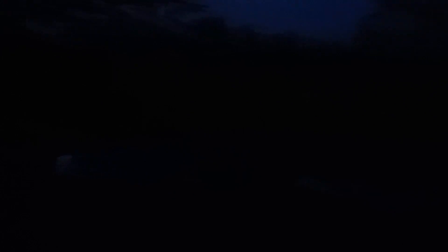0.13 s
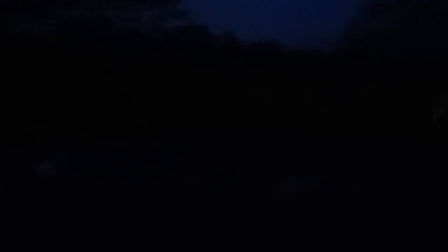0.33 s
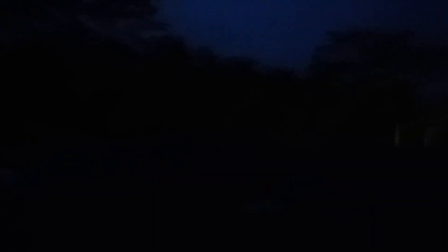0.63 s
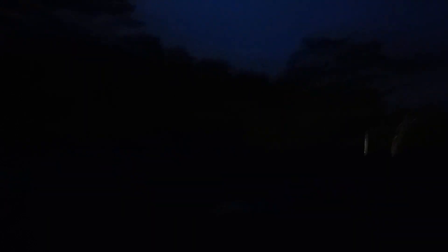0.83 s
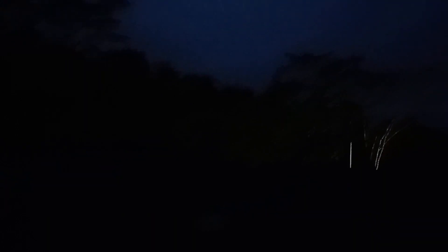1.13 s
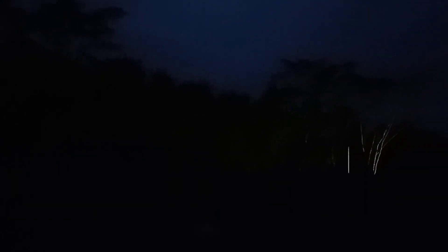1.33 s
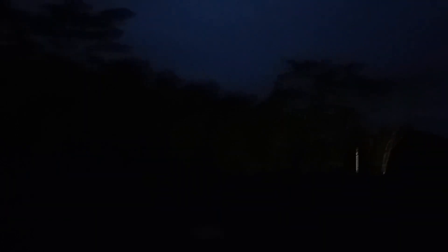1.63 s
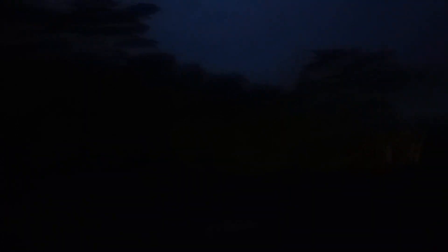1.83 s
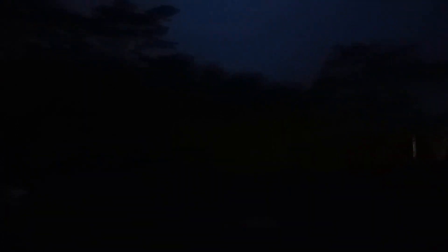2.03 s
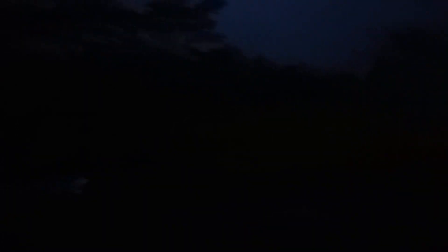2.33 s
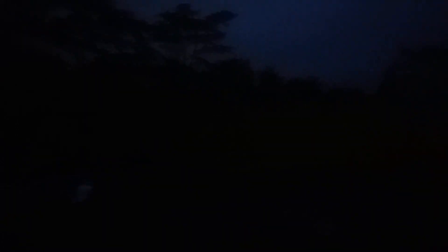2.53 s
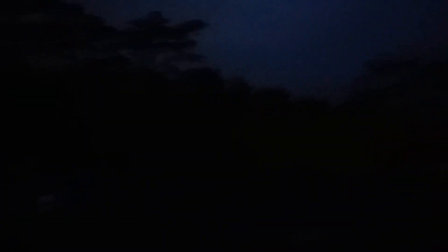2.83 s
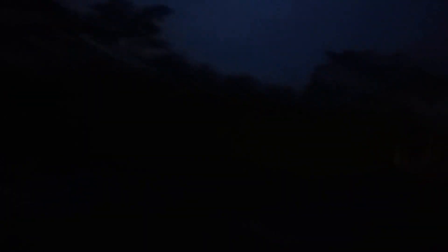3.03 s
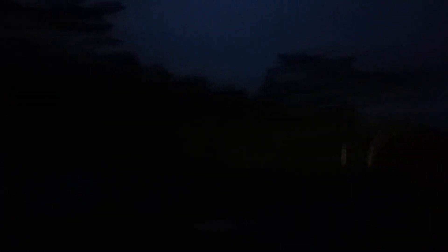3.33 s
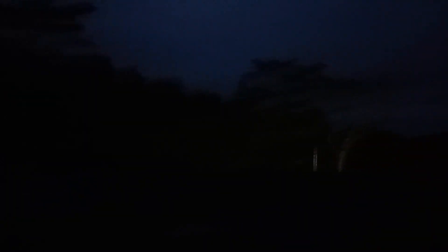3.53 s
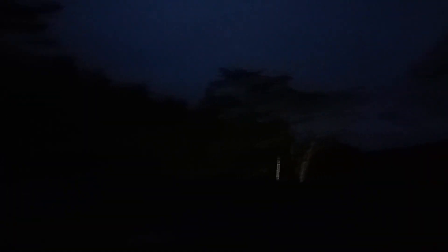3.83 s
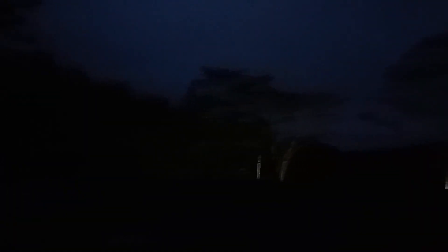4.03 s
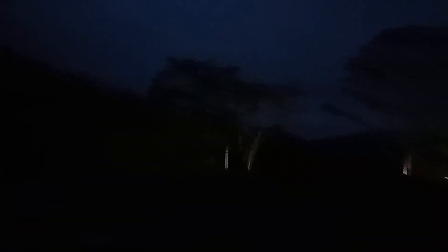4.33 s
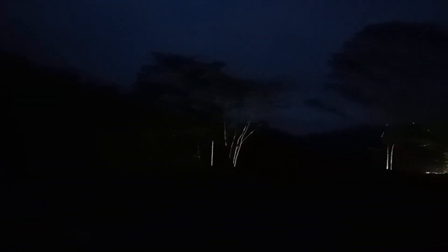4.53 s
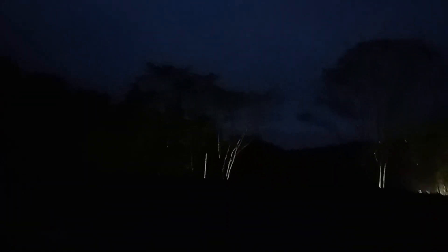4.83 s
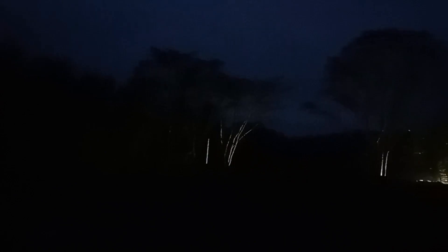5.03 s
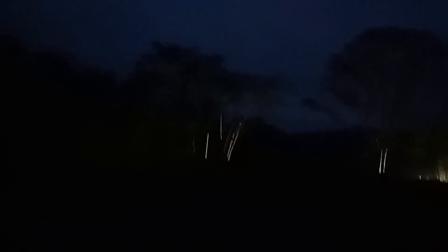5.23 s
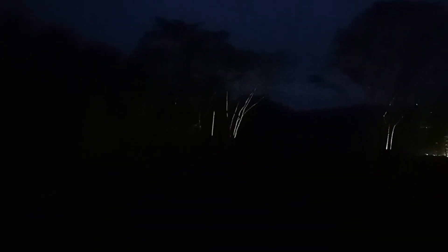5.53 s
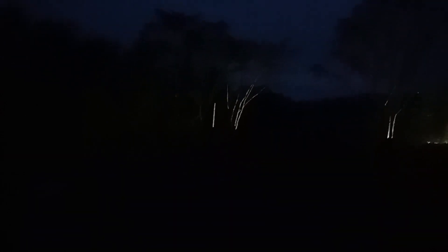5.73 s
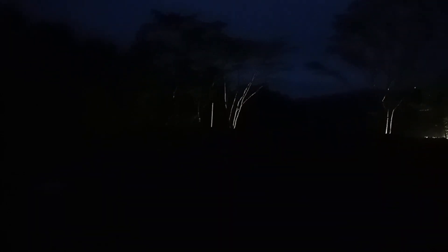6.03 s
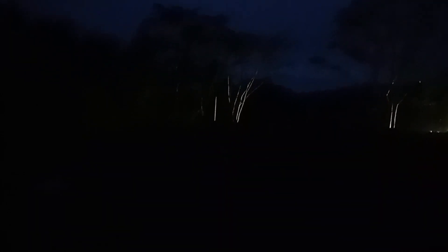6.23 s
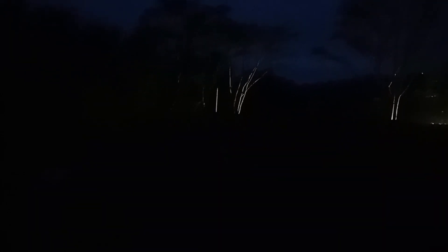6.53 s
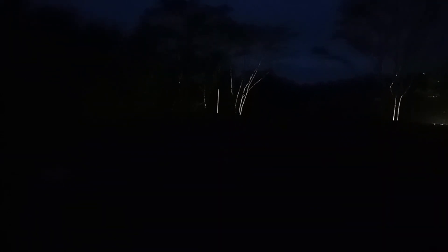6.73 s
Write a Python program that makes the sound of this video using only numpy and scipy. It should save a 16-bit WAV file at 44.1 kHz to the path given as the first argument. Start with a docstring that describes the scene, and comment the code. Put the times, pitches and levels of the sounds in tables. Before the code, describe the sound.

Dusk insect chorus with thin bird whistles echoing off trees, soft frog calls, distant machine hum, and close clicks and scrapes of handling.

```python
"""A forest edge at nightfall, heard at the two microphone ports of a hand-held camera.
Crickets chirp in stroke pairs of falling sine; bush crickets buzz as pulsed noise in narrow resonances.
Birds whistle in gliding sines with tree echoes, and a frog calls 'kee-oo': a falling glide, then a held note.
Fingers rustle, tick and scrape on the camera body: grainy filtered noise and short decaying modes.
Behind them lie a hiss of distant insects and far machines: steady sines over shaped noise."""
import sys
import numpy as np
from scipy import signal
from scipy.fft import rfft, irfft, next_fast_len
from scipy.io import wavfile
from scipy.ndimage import map_coordinates

SR = 44100
rng = np.random.default_rng(int(sys.argv[2]) if len(sys.argv) > 2 else 0)


def dump(signal):
    """Clip the signal to [-1, 1] and save it as 16-bit WAV at the path in sys.argv[1]."""
    limited = np.clip(np.atleast_2d(signal).T, -1, 1)
    pcm = np.round(limited * 32767).astype(np.int16)
    wavfile.write(sys.argv[1], SR, pcm)


N = 303849
SIDE = np.array([[.5], [-.5]])  # shares a left-right difference between the ports


def crickets():
    """Wings chirp at nearly even pace: a steady cricket, a neighbour with its own timing, a lower one in bouts."""
    # runs of chirps: (first chirp [s], last chirp [s], first level [dB], last level [dB])
    steady_runs = [(.07, .671, -63, -69), (.786, 1.146, -65.5, -65.5), (1.27, 2.139, -64.5, -69),
                   (2.348, 3.031, -68, -71.5), (3.133, 4.0, -65.5, -65.5), (4.135, 5.372, -66, -66),
                   (5.506, 6.855, -66, -66)]
    neighbour_runs = [(1.624, 2.23, -71, -75), (2.292, 3.003, -72, -68), (3.73, 3.974, -68, -71),
                      (4.116, 4.949, -66, -71.5), (5.098, 5.471, -80, -69), (5.711, 5.818, -70.5, -71),
                      (5.969, 6.31, -69, -71), (6.452, 6.822, -70.5, -67)]
    low_runs = [(.117, .548, -68, -67), (1.742, 2.177, -72, -67), (3.195, 3.632, -72.5, -70.5)]
    pace_s, low_pace_s = .121, .0725  # usual time from chirp to chirp
    steady = chirps(runs(steady_runs, pace_s), 5920, fall_hz=850, length_s=.021, gap_s=.022,
                    overtones_db=[], click_db=-25, pan_db=5, lead=1.2)
    neighbour = chirps(runs(neighbour_runs, pace_s), 5850, fall_hz=1050, length_s=.0172, gap_s=-.0084,
                       overtones_db=[], click_db=-39, pan_db=6.5, lead=-1.95)
    low = chirps(runs(low_runs, low_pace_s), 3820, fall_hz=700, length_s=.014, gap_s=.021,
                 overtones_db=[-9, -10], click_db=0, pan_db=4.5, lead=.8)
    near = steady + neighbour + low
    return near + amp(-4) * trees(near, t60=.2)


def runs(rows, pace_s):
    """Rows of (time, level) for every chirp in evenly paced runs, each a little early or late."""
    paced = []
    for first_s, last_s, first_db, last_db in rows:
        count = round((last_s - first_s) / pace_s) + 1
        paced.append(np.linspace([first_s, first_db], [last_s, last_db], count))
    chirp_rows = np.concatenate(paced)
    return chirp_rows + [.0017, 1] * rng.standard_normal(chirp_rows.shape)  # stray in s and dB


def chirps(rows, hz, fall_hz, length_s, gap_s, overtones_db, click_db, pan_db, lead):
    """Two wing strokes a chirp; the pitch falls through each, and a noise click sits in its first half."""
    # the camera turns: (time [s], extra phase by which left leads [rad])
    swing = [(0, 0.79), (.6, 0.94), (1.1, .1), (2.1, .1), (2.6, 0.8), (3.3, 0.2), (5, 0.092), (6.89, 0.09)]
    out = np.zeros((2, N))
    t = np.arange(-1, 1, 2 / (length_s * SR))  # -1 to 1 across one stroke
    stroke = np.cos(np.pi / 2 * t) ** 2
    for (s, db), luck in zip(rows, rng.standard_normal((len(rows), 4))):
        turned_lead = lead + np.interp(s, *np.transpose(swing))
        for k in (0, 1):
            pitch = hz * (1 + 0.0132 * luck[k]) - fall_hz * t / 2
            size = amp(db + 1.4 * luck[k + 2])
            sound = sum(tone(order * pitch, stroke * amp(over_db), pan_db, turned_lead)
                        for order, over_db in enumerate([0] + overtones_db, 1))
            click = np.diff(rng.standard_normal((2, len(t) + 1))) * np.exp(-((t + 0.26) / 0.74) ** 2)
            panned_click = amp(click_db + pan_db * SIDE) * click
            add(out, s + k * gap_s - length_s / 2, size * (sound + panned_click))
    return out


def bush_crickets():
    """One buzzes on two wing resonances in phrases that swell and stop dead; another never pauses."""
    # near phrases: (start [s], end [s], upper resonance level [dB], lower resonance level [dB])
    phrases = [(-.2, .48, -77, -82), (1.104, 1.725, -79, -79), (2.301, 2.96, -77, -76),
               (3.4, 4.225, -77.5, -70.5), (4.696, 5.48, -81, -76), (5.997, 6.749, -84, -76.5)]
    # the unbroken buzz: (time [s], level [dB])
    far_level = [(0, -77), (.27, -79), (.88, -71.5), (1.1, -79), (2.55, -74), (3.6, -80), (4.4, -81),
                 (6.1, -77), (6.89, -83)]
    t, upper, lower = np.arange(N) / SR, 0, 0
    for start, end, upper_db, lower_db in phrases:
        rise = np.clip((t - start) / (end - start), 0, 1) ** 0.58
        swell = rise * np.clip((end - t) / 0.017, 0, 1)
        upper = upper + amp(upper_db) * swell
        lower = lower + amp(lower_db) * swell
    near = upper * rasp(145, 7410, 200) + lower * rasp(145, 6814, 270)
    far = amp(curves(far_level)[0]) * rasp(152, 6900, 450)
    return near * amp([[1.5], [-1.5]]) + far


def rasp(rate, hz, width_hz):
    """Wing strokes pulse noise through one resonance, their rate wandering slightly."""
    phase = 2 * np.pi * np.cumsum(rate + 1.4 * wobble(4.4)) / SR
    gate = (1 + np.sin(phase)) ** 0.31
    noise = gate * rng.standard_normal((2, N))
    return unit(filtered(noise, lambda f: ring([(hz, width_hz, 0)])(f) ** 2))


def birds():
    """Whistles are gliding sines that flutter as leaves scatter them, with long echoes from the trees."""
    # long whistles of one bird: (start [s], length [s], pitch [Hz], climb [Hz/s], droop at the end [Hz],
    # level [dB], time of the level dip within the note [s], phase by which left leads [rad])
    held = [(2.774, 0.21, 3112, 352, 1, -62, 0.032, -1), (3.476, 0.27, 2890, 346, 0, -61.5, 0.21, -2),
            (4.248, .215, 2815, 353, 198.5, -57, .11, -2.5), (4.929, 0.21, 2788, 447, 232, -57, 0.11, -2.5),
            (5.137, 0.16, 2980, 1060, 2, -65, .03, -2.5), (5.567, 0.287, 2776, 746, -3, -58.5, 0.14, -2.5),
            (6.088, 0.2, 2707, 850, -5, -56.5, 0.13, -2), (6.409, 0.2, 2678, 603, 5, -58, 0.13, -2),
            (6.609, 0.099, 2674, 504, -3, -57, 0.095, -2)]
    # short bent notes: (start [s], length [s], first pitch [Hz], middle pitch [Hz], last pitch [Hz],
    # level [dB], left-right difference [dB], phase by which left leads [rad], echo relative to note [dB])
    pips = [(0.052, 0.095, 2655, 2740, 2770, -65, -4, 1.57, -1.5),
            (0.153, 0.065, 2760, 2780, 2660, -71.5, 2, 0.2, 0),
            (0.278, 0.065, 2590, 2653, 2650, -67, -4, 0.9, 0),
            (0.402, 0.089, 2470, 2546, 2610, -73, 2, 1.57, 0),
            (.52, 0.052, 2430, 2490, 2520, -73.5, -2.5, 0.5, -7),
            (0.628, 0.033, 2440, 2420, 2460, -65.5, 1, 1.57, -7),
            (.735, .045, 2290, 2320, 2400, -74, 0, 1.5, -7),
            (.845, 0.048, 2220, 2310, 2600, -75, -2.5, 1, -2),
            (.732, 0.024, 3530, 3440, 3230, -69, 3, -2, 0.5),
            (1.002, 0.032, 2280, 2580, 2950, -62, 3, 2.5, -6),
            (1.045, 0.05, 2760, 2570, 2270, -67, 1, 1.5, -10),
            (1.83, 0.017, 2730, 2600, 2490, -72, 2, -8, -11),
            (2.147, 0.04, 3090, 3560, 3500, -62, 2.4, -2, -4),
            (2.303, .03, 4200, 3720, 3300, -73, 3.5, 4.5, -5),
            (2.332, 0.046, 3140, 3010, 3240, -58.5, 2, 4, -7),
            (2.456, 0.0434, 2370, 2690, 2550, -65, 2.4, 1.1, -7),
            (2.498, 0.091, 2350, 2500, 2970, -61.5, 3, 0.6, -7),
            (2.59, .05, 3000, 2690, 2000, -65, 2.4, .9, -10),
            (3.868, 0.023, 3210, 3540, 3170, -65, 2.2, -1.4, -29.5),
            (4.127, 0.031, 2340, 2680, 3040, -73, 4, 4, -4),
            (4.008, .025, 2530, 2480, 2500, -75, 4, 1.5, -9),
            (4.172, .058, 2990, 2650, 2340, -66.5, 1, 4, -3.5),
            (5.233, 0.055, 3150, 3476, 3160, -72, 6, 0, -1),
            (6.595, 0.023, 3680, 3450, 3080, -68, 2.7, -1.5, -3),
            (6.694, 0.032, 2570, 2584, 2660, -65, -1.5, -3, -2),
            (6.772, 0.048, 2480, 2667, 2680, -60.5, -1.5, -2, -3),
            (6.823, .055, 2620, 2630, 2500, -67.5, -3, -1.5, -4)]
    rise_s, fall_s, held_pan_db, held_echo_db = 0.014, 0.036, -0.6, -7.5
    dip_db, dip_s = 7.5, 0.019  # a long note dips once in level where its echoes interfere
    scoop_hz, scoop_s, droop_s = 328, .011, .018  # long notes slide up into their pitch
    pip_sharp = .5  # power of the half-sine envelope
    flutter_db = 3
    notes = []
    for s, length, hz, climb, droop_hz, db, dip_at, lead in held:
        t = np.arange(0, length, 1 / SR)
        edges = np.clip(np.minimum(t / rise_s, (length - t) / fall_s), 0, 1)
        level = edges * amp(db - dip_db * np.exp(-((t - dip_at) / dip_s) ** 2))
        scoop = scoop_hz * np.exp(-t / scoop_s)
        droop = droop_hz * np.exp((t - length) / droop_s)
        pitch = hz + climb * t - scoop - droop
        notes.append((s, pitch, level, held_pan_db, lead, held_echo_db))
    for s, length, first_hz, middle_hz, last_hz, db, *perch in pips:
        u = np.arange(0, 1, 1 / (length * SR))  # fraction of the note
        bend = np.polyfit([0, .5, 1], [first_hz, middle_hz, last_hz], deg=2)
        notes.append((s, np.polyval(bend, u), amp(db) * np.sin(np.pi * u) ** pip_sharp, *perch))
    direct, far, flutter = np.zeros((2, N)), np.zeros((2, N)), wobble(45)
    for s, pitch, level, pan_db, lead, echo_db in notes:
        at = np.minimum(round(s * SR) + np.arange(len(pitch)), N - 1)
        note = tone(pitch, level * amp(flutter_db * flutter[at]), pan_db, lead)
        add(direct, s, note)
        add(far, s, amp(echo_db) * note)
    return direct + trees(far, t60=1.2)


def trees(x, t60):
    """Trunks scatter echoes: decaying noise after a 12 ms gap, a new tail for each port."""
    t = np.arange(SR * 3 // 4) / SR
    tail = rng.standard_normal((2, len(t))) * amp(-60 * t / t60) * (t > .012)
    return signal.fftconvolve(x, tail / np.linalg.norm(tail[0]), axes=1)[:, :N]


def frog():
    """A falling glide, then a held note that reaches the ports in nearly opposite phase."""
    # calls: (start [s], glide level [dB], held note level [dB])
    calls = [(0.154, -86, -67), (0.56, -71, -70), (0.682, -77, -73), (1.172, -73.5, -74), (1.403, -72, -71),
             (1.568, -74, -76), (1.893, -72, -70), (1.992, -74, -79), (2.269, -69, -67.0),
             (2.389, -76, -77.0), (2.645, -69.5, -66), (3.001, -68.5, -68), (3.391, -69.5, -66),
             (4.078, -73, -67), (4.646, -76, -73), (4.85, -71, -72.0), (5.011, -70.5, -67),
             (5.239, -70, -73), (5.369, -72.5, -68), (5.628, -75, -73), (6.042, -69.5, -71.0),
             (6.252, -73, -71.0), (6.627, -72.5, -66)]
    # glide of every call: (time into call [s], pitch [Hz])
    call_pitch = [(-.004, 2040), (.004, 1890), (.024, 1400), (.036, 1100), (.045, 1080), (.1, 1043)]
    out = np.zeros((2, N))
    s, hz = np.transpose(call_pitch)
    t = np.arange(s[0], s[-1], 1 / SR)
    pitch = np.interp(t, s, hz)
    glide_shape = np.exp(-((t - .013) / 0.0105) ** 2)
    hold_shape = np.exp(-((t - .063) / .027) ** 4)
    for start, glide_db, hold_db in calls:
        glide = tone(pitch, amp(glide_db) * glide_shape, pan_db=1.2, lead=-0.11)
        hold = tone(pitch, amp(hold_db) * hold_shape, pan_db=.3, lead=3.65)
        add(out, start + s[0], glide + hold)
    return out


def hands():
    """Skin sticks and slips on the shell as grainy noise; a grip shakes it, and ticks ring it."""
    # skin sliding on plastic: (frequency [Hz], relative level [dB])
    skin = [(1500, -72), (2500, -18.5), (4000, -13.5), (6500, -14.5), (8000, -9.5), (9800, -3.5),
            (11000, -8), (14500, -16.5), (16000, -39)]
    # camera shell resonances: (frequency [Hz], width [Hz], relative level [dB])
    shell = [(264, 130, 3), (1320, 1100, -14)]
    # finger strokes: (loudest at [s], build-up [s], dying [s], hiss level [dB], body level [dB],
    # left-right difference of the hiss [dB])
    strokes = [(0, .01, .3, -66, -67.5, -12), (0.046, .008, 0.085, -52, -62, -7.5),
               (.148, 0.75, 0.2, -60, -65.5, -7), (.49, .9, .2, -65, -73, -8),
               (.57, 0.093, 0.26, -68, -73.5, -3), (.74, 0.45, 0.13, -71, -73.5, -2),
               (2.031, .03, 0.11, -66, -65.5, 3), (2.105, .04, 0.64, -76, -73, 7),
               (2.28, .06, .06, -73, -74, -3), (3.284, 0.091, 0.48, -75, -78, 8),
               (3.502, 0.065, .06, -74, -93, 4.5), (3.574, 0.064, .08, -75, -85, 11),
               (4.415, .04, .5, -64, -72, -8), (4.47, .1, .7, -57, -64, -8),
               (4.535, .17, .14, -57, -63, -8), (4.565, 0.07, 0.028, -56, -53, -5),
               (4.673, .04, 0.025, -57, -56, -7), (4.784, .05, .25, -58, -64, -3),
               (5.1, 3.4, 1, -69, -74.5, -.5), (5.375, 0.27, 1, -73, -77, -4.5),
               (5.63, 0.15, 0.36, -63.5, -70, -2), (5.772, 0.26, 0.45, -68, -68, -1.5),
               (6.112, 0.076, 0.07, -71, -69.5, -5), (6.236, 0.23, 0.14, -75, -85, 4)]
    # ticks: (time [s], high ring [dB], 4 kHz ring [dB], shell knock [dB], left-right difference [dB]),
    # ring and knock levels ahead of the offset of each mode
    ticks = [(0.043, -42, -75, -54, -9.5), (0.093, -45, -69, -55.5, -11.5), (0.153, -44, -65, -56, -9.0),
             (0.5177, -68.5, -54, -77, -3.0), (1.6548, -72, -80, -55, 3), (1.946, -34.5, -36.5, -73, 2),
             (1.96, -49, -73, -83, 6), (2.0389, -41.5, -47, -42.5, -2), (2.0425, -44, -54, -41.5, 1),
             (2.4463, -55, -74, -73, 5), (3.1344, -64, -75, -58, -0.5), (3.302, -54, -74, -62, 7),
             (4.4244, -59, -73, -61, -10), (4.4696, -56, -54, -74, 3), (4.5592, -61, -75, -47, 3),
             (4.6252, -51, -62, -72, -10), (4.634, -70, -66, -51, -5), (4.6688, -48, -64, -58, -12),
             (4.7749, -46, -76, -54.5, -20), (4.802, -51, -73, -56, -10), (4.82, -46, -69, -71, -10),
             (4.9848, -56, -57, -61, 2), (5.519, -66, -73, -75, 1), (5.538, -62, -70, -57, -1.5),
             (5.659, -61, -74, -79, -3), (5.668, -59, -72, -74, -3.5), (5.766, -65, -71, -53, -2.0),
             (5.9794, -68, -67, -55, 0.0), (6.1123, -62, -65, -57, -3.0)]
    stroke_range_db = 30  # build-up and dying are timed over this range
    crackle_per_s, crackle_db, crackle_spread_db = 90, -2.5, 2.5  # relative to the stroke under them
    grip_s, grip_hold_s, grip_edge_s = 5.583, 0.045, 0.014  # middle, hold, time to sink 12 dB
    grip_shake_db, grip_hiss_db, grip_body_db = -47, -49, -57.5
    t = np.arange(N) / SR
    grain = amp(3 * wobble(600) + 1.2 * wobble(60))  # stick and slip
    hiss = unit(filtered(grain * rng.standard_normal((2, N)), lambda hz: amp(along(skin, hz))))
    body = unit(filtered(grain * rng.standard_normal((2, N)), lambda f: ring(shell[1:])(f) ** 2))
    shake = unit(filtered(grain * rng.standard_normal(N), ring(shell)))

    outside_grip = np.clip(np.abs(t - grip_s) - grip_hold_s / 2, 0, 1)
    grip = amp(-12 * (outside_grip / grip_edge_s) ** 2)
    gripped = amp(grip_shake_db) * shake + amp(grip_hiss_db - SIDE * 2) * hiss + amp(grip_body_db) * body

    slide, press = np.zeros((2, N)), np.zeros(N)
    for s, rise_s, fall_s, hiss_db, body_db, pan_db in strokes:
        shape = slope(t, s, rise_s, fall_s, stroke_range_db)
        slide = np.maximum(slide, amp(hiss_db + SIDE * pan_db) * shape)
        press = np.maximum(press, amp(body_db) * shape)
    out = grip * gripped + slide * hiss + press * body

    for s, *levels in ticks:
        add(out, s, tick(*levels))
    # small chance ticks, sized by the stroke under them
    for when, size in rng.random((int(crackle_per_s * N / SR), 2)):
        i = int(when * N)
        db = crackle_db - crackle_spread_db * np.log(1 - size)
        add(out, i / SR, slide[:, i:i + 1] * tick(db, db - 25, db - 16, 0))
    return out


def slope(t, peak_s, rise_s, fall_s, range_db):
    """Gain that climbs range_db to a peak and sinks again."""
    return amp(-range_db * np.maximum((peak_s - t) / rise_s, (t - peak_s) / fall_s))


def tick(high_db, mid_db, knock_db, pan_db):
    """One tick rings four decaying modes of the body under a very short noise crack."""
    # body modes, the last two being the knock: (frequency [Hz], level offset [dB], 60 dB decay time [s])
    modes = [(10130, -3, 0.0088), (3830, -1, 0.0096), (1224, -0.5, 0.012), (697, -3.5, 0.015)]
    t = np.arange(SR // 40) / SR
    snap = 0
    for db, (hz, over_db, t60) in zip([high_db, mid_db, knock_db, knock_db], modes):
        tuned_hz = hz * (1 + .025 * rng.standard_normal())
        snap = snap + amp(db + over_db - 60 * t / t60) * np.sin(2 * np.pi * tuned_hz * t)
    crack = amp(high_db - 13 - 60 * t / 0.0018) * np.diff(rng.standard_normal(len(t) + 2), n=2)
    return amp(pan_db * SIDE) * (snap + crack)


def air():
    """Distant insects blend into a hiss, unrelated at the two ports, with a pulsed band near 3.7 kHz."""
    # far chorus and hiss: (frequency [Hz], relative level [dB])
    hiss_colour = [(500, -33), (800, -5), (1200, -8), (1700, -7.5), (2200, -8.5), (2900, -6), (3600, -14.5),
                   (4500, -8.5), (5400, -4), (6000, -3.5), (6600, -1.5), (7100, -12), (7800, -10),
                   (10000, -11), (13000, -17.5), (16000, -23.5)]
    # far insects that come and go: (time [s], level [dB])
    chirr_level = [(0, -74), (.3, -71.5), (1.45, -95), (1.73, -73.5), (2.1, -78.5), (3.35, -77),
                   (3.85, -86), (4.75, -73), (5.8, -81.5), (6.5, -76.5), (6.89, -86)]
    hiss = filtered(rng.standard_normal((2, N)), lambda hz: amp(along(hiss_colour, hz)))
    chirr = amp(curves(chirr_level)[0]) * rasp(48, 3670, 1100)
    return amp(-68.0 + 0.48 * wobble(0.63)) * unit(hiss) + chirr


def machines():
    """Far shafts hum at multiples of their rates, wavering slightly, over rumble alike at both ports when low."""
    # (shaft or firing rate [Hz], list of (multiple of the rate, relative level [dB]))
    shafts = [(13.175, [(3, -80.0), (5, -78.0), (6, -56.0), (7, -65.0), (8, -64.0), (9, -53.0), (12, -64.0),
              (14, -78.0), (15, -75.0), (16, -70.0), (17, -75.0), (18, -64.0), (19, -73.0), (21, -75.0),
              (25, -79.0), (42, -85.0), (43, -88.0)]), (67.965, [(1, -60.0), (2, -70.0), (3, -76.0),
              (4, -70.0), (5, -76.0)]), (75.45, [(1, -60.0), (2, -63.0), (3, -76.0), (5, -81.0),
              (6, -86.0)]), (95.89, [(1, -71.0), (2, -79.0)])]
    # lone steady tones: (frequency [Hz], relative level [dB])
    drones = [(86.4, -73.0), (112.4, -69.0), (131.7, -74.0), (245.9, -73.0), (259.2, -76.0), (327.0, -79.0),
              (335.4, -74.0), (352.1, -76.0), (362.4, -79.0), (373.8, -80.0), (402.4, -74.0)]
    # noise of the machines: (frequency [Hz], density ahead of the port balance [dB per Hz])
    rumble = [(30, -100.0), (45, -100.5), (60, -86.5), (75, -77.5), (100, -90.5), (125, -76), (155, -80),
              (180, -84), (250, -82.5), (350, -85), (450, -88), (600, -95.5), (800, -106), (1100, -116),
              (2000, -140)]
    # (frequency [Hz], left-right likeness of the rumble [0 to 1])
    rumble_alike = [(40, 0.58), (125, 0.54), (250, 0.65), (500, 0.044), (1000, 0.017)]
    t = np.arange(N) / SR
    lines = [(rate * k, db) for rate, orders in shafts for k, db in orders] + drones
    hum = sum(amp(db + 3.5 + 0.42 * wobble(2.97)) * np.sin(2 * np.pi * (hz * t + rng.random()))
              for hz, db in lines)

    def mid_side(hz):
        """Splits the rumble into mid and side by its likeness."""
        turn = np.arccos(np.clip(along(rumble_alike, hz), -1, 1)) / 2
        return amp(along(rumble, hz)) * [np.cos(turn), np.sin(turn)]

    mid, side = filtered(rng.standard_normal((2, N)) * np.sqrt(SR / 2), mid_side)
    return amp([[-.35], [.35]]) * (hum + np.array([mid + side, mid - side]))


def amp(db):
    """Gain of a level in dB."""
    return 10 ** (np.asarray(db) / 20)


def unit(x):
    """Scaled to rms 1."""
    return x / np.sqrt(np.mean(x ** 2) + 1e-20)


def along(points, hz):
    """Value at hz between (Hz, value) points on a log axis."""
    f, v = np.transpose(points)
    return np.interp(np.log(hz + 1), np.log(f + 1), v)


def curves(rows):
    """One value per sample for each column after the time."""
    s, *cols = np.transpose(rows)
    return [np.interp(np.arange(N) / SR, s, c) for c in cols]


def wobble(rate):
    """A smooth random curve, rate knots a second."""
    knots = rng.standard_normal(int(N * rate / SR) + 4)
    return map_coordinates(knots, [np.arange(N) * rate / SR])


def filtered(x, response):
    """x times a response over frequency, real or complex."""
    m = next_fast_len(N + SR // 2)
    return irfft(rfft(x, m) * response(np.fft.rfftfreq(m, 1 / SR)), m)[..., :N]


def ring(modes):
    """Causal response of (Hz, width in Hz, dB) resonances, summed with alternating sign."""
    return lambda f: sum((-1) ** k * amp(db) * 1j * f * w / (c * c - f * f + 1j * f * w)
                         for k, (c, w, db) in enumerate(modes))


def add(track, s, sound):
    """Mixes a stereo sound into track from time s."""
    i = max(round(s * SR), 0)
    track[:, i:i + sound.shape[1]] += sound[:, :N - i]


def tone(hz, level, pan_db, lead):
    """A gliding sine at the two ports; level is rms; the lead [rad] is a delay, so it grows with pitch."""
    phase = 2 * np.pi * (np.cumsum(hz) / SR + rng.random())
    port_phase = phase + SIDE * lead * hz / np.mean(hz)
    return np.sqrt(2) * level * amp(SIDE * pan_db) * np.sin(port_phase)


def scene():
    """Singers with their echoes, the hands and the far floor."""
    return crickets() + bush_crickets() + birds() + frog() + hands() + air() + machines()


def record(dry):
    """The camera keeps nothing above its band limit."""
    top_hz = 15700
    return filtered(dry, lambda hz: hz < top_hz)


dry = scene()
out = record(dry)
dump(out)
```